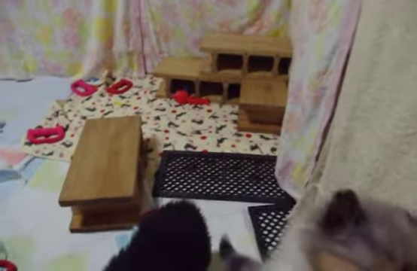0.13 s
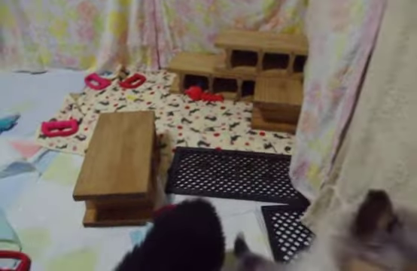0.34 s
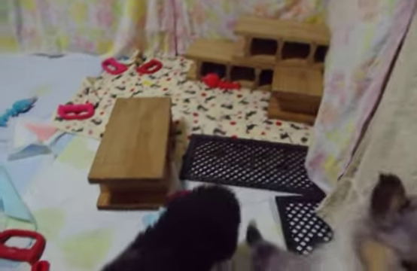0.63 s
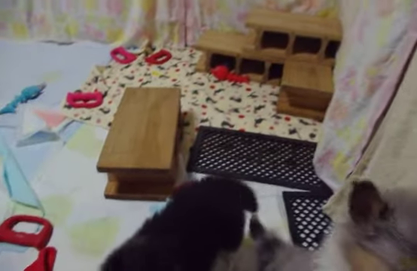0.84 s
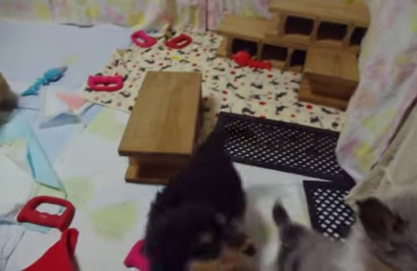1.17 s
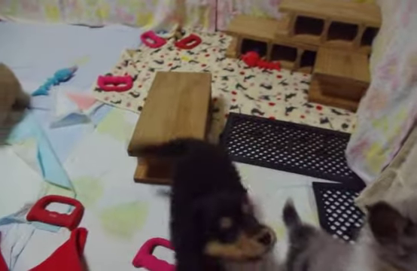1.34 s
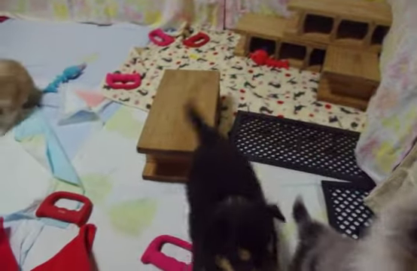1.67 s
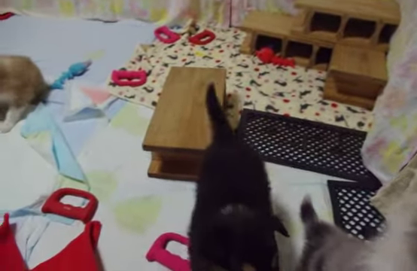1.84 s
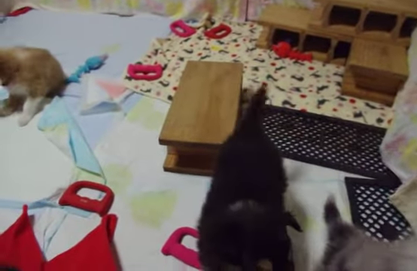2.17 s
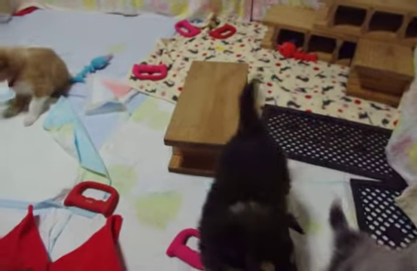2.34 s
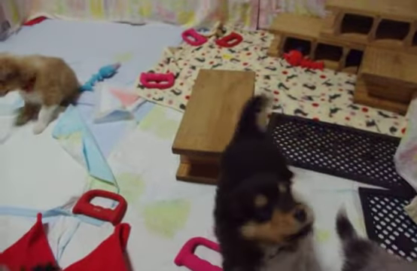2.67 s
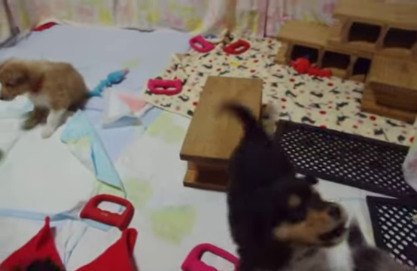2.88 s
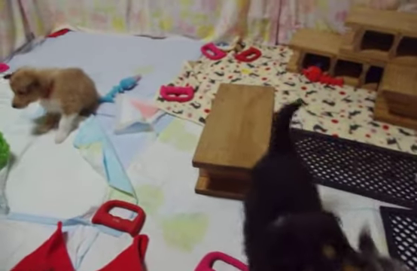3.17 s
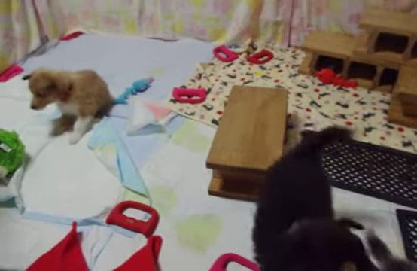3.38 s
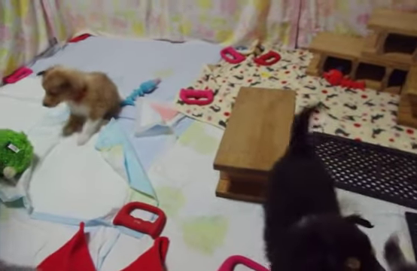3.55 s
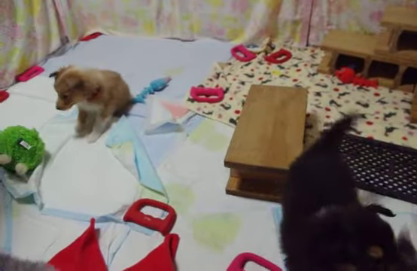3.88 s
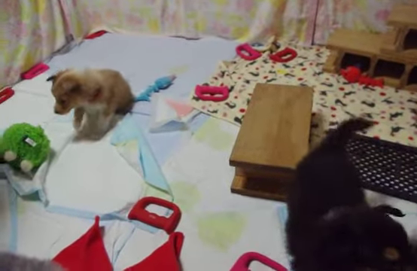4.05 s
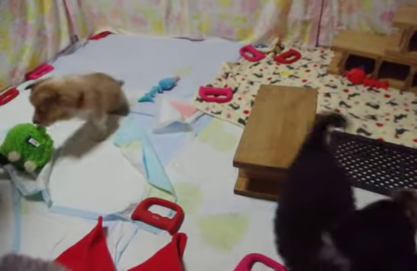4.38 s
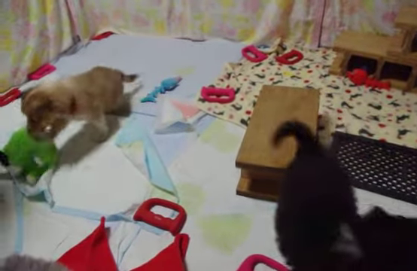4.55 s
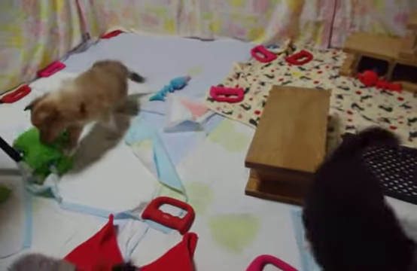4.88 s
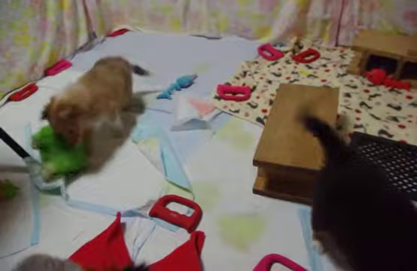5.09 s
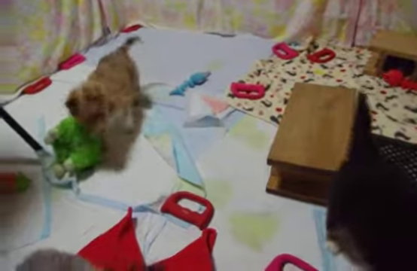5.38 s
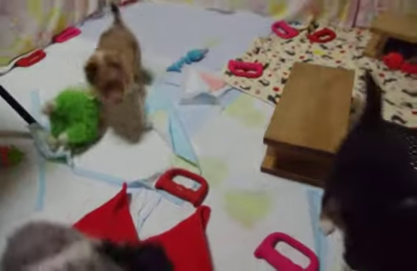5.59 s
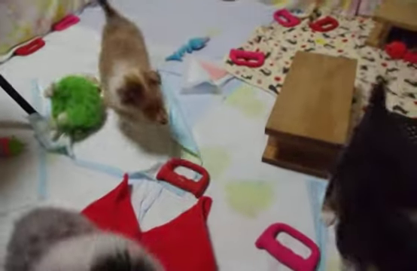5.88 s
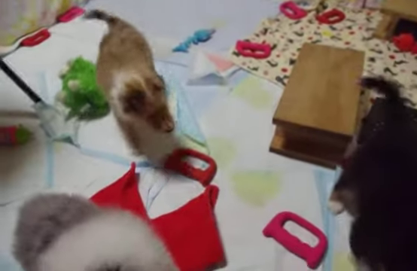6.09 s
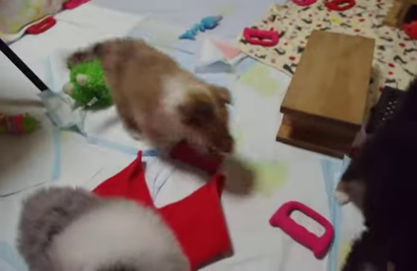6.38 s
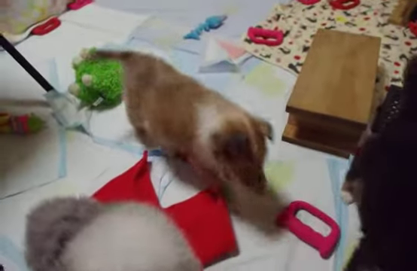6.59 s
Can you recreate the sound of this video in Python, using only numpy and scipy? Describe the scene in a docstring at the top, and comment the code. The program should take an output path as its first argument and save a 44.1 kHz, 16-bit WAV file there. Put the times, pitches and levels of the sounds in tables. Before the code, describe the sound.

A puppy yips and moans, lets out a long piercing howl that turns hoarse, then yelps and whines amid paw thumps and claw ticks.

```python
"""A puppy yips and moans, gives a long strained howl that turns rough, then a short yelp and a falling whine.
Each cry is a nearly pure tone with weak overtones and breathy noise; rasps are noise in slow, uneven pulses.
Claws tick (snaps and short rings), paws thump (dull fading notes) and scuff over paper pads (grainy noise), and
a pup snuffles (a puff of noise). Weak echoes of a cloth-walled indoor pen surround them. A quiet room lies
behind with steady noise; near the end a low hum and rumble come up."""
import sys
import numpy as np
from scipy import signal
from scipy.fft import rfft, irfft
from scipy.io import wavfile
from scipy.ndimage import uniform_filter1d

SR = 44100
rng = np.random.default_rng(int(sys.argv[2]) if len(sys.argv) > 2 else 0)


def transcribe(signal):
    """Save signal, clipped to [-1, 1], as a 16-bit WAV file at the path in sys.argv[1]."""
    frames = np.atleast_2d(signal).T
    limited = np.clip(frames, -1, 1)
    pcm = np.round(limited * 32767).astype(np.int16)
    wavfile.write(sys.argv[1], SR, pcm)


N = 296793
T = np.arange(N) / SR  # time of every sample, s

# Five cries, each from full voice to the start of its fade, before any wobble is added:
# [t/s, pitch f/Hz, fundamental level/dB, overtone level/dB]
YIP_PATH = [(1.305, 1053, -25, -52), (1.314, 986, -28, -51), (1.324, 923, -29, -57), (1.334, 847, -42, -52),
            (1.346, 692, -37.5, -49.5)]
MOAN_PATH = [(1.446, 608, -26.5, -52), (1.466, 631, -33.5, -46), (1.502, 710, -31, -69),
             (1.522, 698, -31, -52.5), (1.596, 604, -34.5, -66), (1.612, 563, -29.5, -73)]
HOWL_PATH = [(2.514, 1785, -11, -47), (2.545, 1612, -15, -34), (2.595, 1539, -13, -34),
             (2.637, 1546, -26, -24.5), (2.654, 1654, -24.5, -28.5), (2.684, 1531, -31, -38.5),
             (2.703, 1225, -23, -40.5), (2.74, 1079, -17, -39), (2.785, 1104, -13.5, -28.5),
             (2.83, 1133, -15, -31), (2.9, 1095, -15.5, -33.5), (2.96, 1110, -17, -41),
             (3.0, 1143, -12, -37), (3.064, 1157, -13, -42)]
YELP_PATH = [(4.311, 1195, -20, -39.5), (4.322, 1152, -21, -35), (4.33, 1000, -23.5, -42),
             (4.342, 880, -44, -44)]
WHINE_PATH = [(4.62, 1326, -23, -44), (4.638, 1314, -18, -39), (4.662, 1274, -26, -51),
              (4.684, 1244, -22, -48), (4.772, 1218, -22.5, -52.5), (4.803, 1213, -40, -49),
              (4.83, 1129, -37, -43.5), (4.878, 1055, -38, -48.5), (4.892, 884, -32, -47),
              (4.901, 760, -41, -56)]
# How strained the voice is in the howl: [t/s, strain 0-1]
HOWL_STRAIN = [(2.6, 0.44), (2.68, 0.43), (2.97, 0.97), (3.0, 0.15)]
# Moments when the wail catches and its pitch sags: [t/s, sag as a share of the pitch]
HOWL_CATCHES = [(2.772, 0.0672), (2.805, .085), (2.853, .025), (2.911, 0.067), (2.941, .02), (2.982, 0.045)]
# The vocal folds break into a rasp:
# [t/s, length/s, level/dB, throat resonance f/Hz, upper resonance level/dB]
RASP_EVENTS = [(2.508, 0.014, -30.5, 1570, -43), (2.623, 0.04, -24, 1490, -29.5),
               (2.661, 0.11, -31, 1544, -54), (4.32, 0.045, -22, 1925, -37), (4.333, 0.055, -40, 1100, -63),
               (4.339, 0.053, -40.5, 1820, -61), (4.882, 0.015, -30.5, 990, -60)]
# Colour of the upper harmonics through the open mouth: [f/Hz, relative level/dB]
MOUTH_COLOUR = [(1500, -6), (2100, 1), (2700, -11), (3250, 1.5), (3750, -9.5), (4400, 2), (5400, -3),
                (6400, -4.5), (8000, -12.5), (9500, -30), (12000, -49.5), (15000, -42)]
# Colour of the upper harmonics through the nose: [f/Hz, relative level/dB]
NOSE_COLOUR = [(1800, 4), (2800, -13), (3400, -5.5), (4050, 2.5), (5000, -17.5), (6100, -11), (7000, -31),
               (7850, -2), (8800, -57), (12000, -39)]
# Colour of the rushing air in a cry: [f/Hz, relative level/dB]
AIR_COLOUR = [(100, -37), (400, -43), (900, -27.5), (1600, 4.5), (2700, -8), (4200, -0.5), (6200, 3.5),
              (8200, 9.5), (9500, 1), (11000, -25), (15000, -28)]
# Clear claw and tooth contacts on hard things: [t/s, level/dB, resonance f/Hz, time to ring down 60 dB/s]
CLEAR_TICKS = [(0.045, -41, 7560, .015), (0.8557, -37.5, 6740, 0.0079), (1.238, -40.5, 4060, .0087),
               (1.4172, -34, 6340, 0.017), (1.707, -39.5, 7300, 0.034), (1.728, -33.5, 8550, 0.037),
               (2.063, -38.5, 6350, 0.013), (2.308, -39, 8350, 0.059), (2.3355, -35, 3270, 0.02),
               (2.444, -38.5, 6940, 0.029), (3.098, -34, 8500, 0.022), (3.5824, -40, 7400, 0.033),
               (3.6929, -37, 5100, 0.0087), (3.874, -40.5, 3200, 0.03), (4.0893, -38.5, 7550, 0.0069),
               (4.2467, -32.5, 8900, 0.0041), (5.568, -40, 1180, 0.022), (5.857, -33.5, 7100, 0.015),
               (6.047, -41.5, 1920, 0.035), (6.117, -30, 6100, 0.0049)]
# Heavier paw falls on the floor and on toys: [t/s, level/dB, resonance f/Hz]
PAW_FALLS = [(1.862, -34, 380), (1.947, -29.5, 332), (2.13, -36.5, 370), (2.335, -30, 690),
             (3.645, -35, 382), (4.785, -28.5, 578), (4.818, -33.5, 337), (5.15, -36, 228),
             (5.568, -32.5, 606), (6.095, -35, 257), (6.681, -31.5, 376)]
# Clear scuffs of paws and fur on the pads: [t/s, length/s, level/dB before flicker]
PAD_SCUFFS = [(0.61, .12, -60.5), (1.38, 0.17, -49.5), (1.68, .12, -51), (1.857, 0.12, -51.5),
              (2.024, 0.056, -51.5), (2.137, 0.054, -55), (4.559, 0.29, -50), (4.817, 0.016, -38),
              (5.032, 0.038, -42.5), (5.119, 0.23, -57.5), (5.7, 0.057, -55), (5.839, 0.16, -47.5),
              (5.99, 0.064, -48.5), (6.077, 0.1, -44.5)]
# Ongoing shuffling of the litter: [t/s, level/dB before flicker]
LITTER_SHUFFLE = [(0, -63.5), (.45, -59.5), (.8, -54.5), (1.15, -60), (1.6, -54), (2.25, -59), (2.5, -54.5),
                  (3.6, -57.5), (4.3, -58), (5.1, -55.5), (6.73, -54.5)]
# Colour of the rustling paper: [f/Hz, relative level/dB]
PAPER_COLOUR = [(300, -14), (1000, -1), (2500, -3.5), (4500, 0), (7500, 3), (10000, 4), (12000, -11.5),
                (15000, -26.5)]
# Colour of a puff through the nose: [f/Hz, relative level/dB]
SNUFFLE_COLOUR = [(500, -27), (1200, -2), (1600, 5), (2200, -17), (4000, -28), (7800, -2.5), (11000, -28)]
# Echoes from near surfaces: [delay t/s, gain]
NEAR_ECHOES = [(.0031, 0.074), (.0074, 0.042), (0.011, .06)]
# Colour of the room's background noise: [f/Hz, relative level per Hz/dB]
ROOM_COLOUR = [(15, -73), (25, -49), (69, -16), (257, -0.5), (301, -1), (335, 0), (573, -3), (673, -2.5),
               (811, -3.5), (879, -7), (1000, -6), (3930, -14.5), (8100, -29.5), (12400, -26.5),
               (15000, -40)]

# Cries swell in and die away at these rates; the air starts earlier and lingers longer
ATTACK_DB_PER_S, RELEASE_DB_PER_S = 2802, 1050
AIR_ATTACK_DB_PER_S, AIR_RELEASE_DB_PER_S = 695, 380
AIR_FOLLOWS = 0.19  # dB of air for each dB of overtones
SHIMMER_DB = 4.5  # most that an overtone flickers up or down
# Side tones between the harmonics: at thirds of the pitch in the shriek, then a faint one at 1.5 times
# the pitch in the wail: (from s, to s, level in dB against the overtones)
SHRIEK_SIDE_TONES, WAIL_SIDE_TONE = (2.56, 2.652, -0.5), (2.72, 4.1, -21)
CATCH_WIDTH_S, CATCH_DIP_DB, CATCH_DIP_LEAD_S = .009, -5.5, 0.0065
RASP_UPPER_HZ = 4380
FAINT_TICKS_PER_S, FAINT_TICK_SPREAD_DB = 1.8, 4  # spread is up or down
FAINT_TICK_DB, FAINT_TICK_HZ, FAINT_TICK_T60_S = -45.5, 7400, .014  # middle level and pitch
THUMP_CYCLES = 16.5  # cycles to fade by 60 dB, so low thumps ring longer
ROOM_TONE_DB, ROOM_T60_S = -55, .28
TOP_HZ = 15300


def undb(db):
    """Turn decibels into gain."""
    return 10 ** (np.asarray(db) / 20)


def unit(x):
    """Scale to an average strength (rms) of 1."""
    return x / np.sqrt(np.mean(x ** 2) + 1e-20)


def response(points, hz):
    """Read a colour table as gain at the given frequencies."""
    f, db = np.transpose(points)
    return undb(np.interp(np.log(hz + 1), np.log(f), db))


def colour(x, points):
    """Filter a sound by a colour table; rms 1."""
    hz = np.fft.rfftfreq(2 * N, 1 / SR)
    spectrum = rfft(x, 2 * N) * response(points, hz)
    return unit(irfft(spectrum)[:N])


def resonate(x, hz, q):
    """Let one damped resonance ring; a higher q rings longer."""
    b, a = signal.iirpeak(min(hz, .45 * SR), max(q, hz / (.4 * SR)), fs=SR)
    return signal.lfilter(b, a, x)


def noise():
    """White noise as long as the scene."""
    return rng.standard_normal(N)


def walk(rate):
    """Smooth random drift of rms 1, changing about rate times a second."""
    size = max(int(SR / rate), 2)
    return unit(uniform_filter1d(uniform_filter1d(noise(), size), size))


def swell(start, length):
    """A quick rise and slower fall."""
    return np.sin(np.pi * np.clip((T - start) / length, 0, 1) ** 0.52) ** 2


def gate(start, end, edge_s=0.027):
    """1 between two times, with soft edges."""
    return np.clip(np.minimum(T - start, end - T) / edge_s + .5, 0, 1)


def add(track, start, sound):
    """Mix a sound into a track at a time in seconds."""
    i = int(start * SR)
    track[i:i + len(sound)] += sound[:N - i]


def puppy():
    """Three cries through the nose, two through the open mouth, and rasps on top."""
    # the yelp cracks half way and turns airy
    crack = np.interp(T, [4.321, 4.331], [0, 1])
    rough = .006 + .06 * crack
    # the whine frays as it runs out
    fray = np.interp(T, [4.78, 4.83, 4.875, 4.89], [.05, .27, .33, 1])
    waver, stutter = .03 * fray, 1.8 * fray
    yip = cry(YIP_PATH, NOSE_COLOUR, second_db=3, air_db=-45, jitter=0.0066)
    moan = cry(MOAN_PATH, NOSE_COLOUR, second_db=2.0, air_db=-54, jitter=0.0043, second_follows=0.24)
    yelp = cry(YELP_PATH, MOUTH_COLOUR, second_db=9, air_db=-47 + 7.2 * crack, jitter=rough)
    whine = cry(WHINE_PATH, NOSE_COLOUR, second_db=-2, air_db=-51.5, jitter=waver, tremble=stutter)
    return yip + moan + howl() + yelp + whine + rasps()


def howl():
    """A shriek with side tones between its harmonics, then a lower, hoarse wail that catches and steadies."""
    strain = np.clip(np.interp(T, *np.transpose(HOWL_STRAIN)), 0, 1)
    sag = sum(depth * catch(start) for start, depth in HOWL_CATCHES)
    # the fundamental dips just ahead of each sag in pitch
    dip_db = CATCH_DIP_DB * sum(catch(start - CATCH_DIP_LEAD_S) for start, depth in HOWL_CATCHES)
    jitter, tremble, hoarse_db = .003 + .006 * strain, .45 * strain, 8 * strain
    # whole multiples of the pitch are left out
    third_multiples = [k / 3 for k in range(4, 15) if k % 3]
    side_tones = [(SHRIEK_SIDE_TONES, third_multiples), (WAIL_SIDE_TONE, [1.5])]
    return cry(HOWL_PATH, MOUTH_COLOUR, second_db=-4.5, air_db=hoarse_db - 45.5, jitter=jitter,
               tremble=tremble, bend=-sag, dip_db=dip_db, side_tones=side_tones)


def catch(start):
    """A brief smooth bump in time."""
    return np.exp(-((T - start) / CATCH_WIDTH_S) ** 2)


def cry(table, tract, second_db, air_db, jitter, second_follows=1.0, tremble=0, bend=0, dip_db=0, side_tones=()):
    """Nearly pure fold vibration, weak overtones shaped by the tract, and air pulsing between the folds."""
    s, pitch, first_db, upper_db = np.transpose(table)
    on = (T > s[0] - .035) & (T < s[-1] + .07)  # work only around the cry
    t = T[on]
    early, late = np.maximum(s[0] - t, 0), np.maximum(t - s[-1], 0)
    envelope = undb(-ATTACK_DB_PER_S * early - RELEASE_DB_PER_S * late)
    first_db = (np.interp(T, s, first_db) + dip_db)[on]
    upper_db = np.interp(t, s, upper_db)
    first, upper = envelope * undb(first_db), envelope * undb(upper_db)
    # the second harmonic and the air both grow with the overtones
    second = envelope * undb(second_db + first_db + second_follows * (upper_db - first_db))
    air_level_db = (air_db + np.zeros(N))[on] + AIR_FOLLOWS * (upper_db - upper_db.max())
    air = undb(air_level_db - AIR_ATTACK_DB_PER_S * early - AIR_RELEASE_DB_PER_S * late)
    # uneven cycles blur the high harmonics first
    uneven = .55 * walk(170) + .9 * walk(1500)
    smooth_pitch = uniform_filter1d(np.interp(t, s, pitch), size=260)
    hz = smooth_pitch * (1 + (bend + jitter * uneven)[on])
    phase = 2 * np.pi * np.cumsum(hz) / SR

    def partials(multiples):
        """Tones at multiples of the pitch, coloured by the tract, each flickering; scaled to about rms 1."""
        gains = [response(tract, k * hz) for k in multiples]
        flickers = [undb(SHIMMER_DB * np.tanh(walk(112)[on])) for k in multiples]
        tones = 0
        for k, gain, flicker in zip(multiples, gains, flickers):
            tones = tones + gain * flicker * np.sin(k * phase + rng.uniform(0, 2 * np.pi))
        return tones / np.sqrt(sum(g ** 2 for g in gains) / 2)

    # a strained voice trembles about forty times a second
    beats = np.sin(np.pi * np.cumsum(40 * (1 + .35 * walk(40))) / SR) ** 4
    shake = (1 - np.clip(tremble, 0, .8) * (beats - beats.mean()))[on]
    voice = np.sqrt(2) * (first * shake * np.sin(phase) + second * np.sin(2 * phase))
    voice += upper * partials(np.arange(3, 13))
    air_pulse = 1 + .5 * np.cos(phase)
    voice += air * colour(noise(), AIR_COLOUR)[on] * air_pulse * shake * undb(1.87 * walk(200)[on])
    for (start, end, db), multiples in side_tones:
        voice += upper * undb(db) * gate(start, end)[on] * partials(multiples)
    out = np.zeros(N)
    out[on] = voice
    return out


def rasps(flap_hz=155):
    """Uneven slow flaps of the folds ring two throat resonances where a cry cracks."""
    out = 0
    flaps = np.sin(np.pi * np.cumsum(flap_hz * (1 + 0.1943 * walk(158.8))) / SR) ** 4 + 0.077

    def ring(hz):
        """Noise pulsed by the flaps through a doubled resonance; rms 1."""
        return unit(resonate(resonate(noise() * flaps, hz, 6.5), hz, 6.5))

    upper = ring(RASP_UPPER_HZ)
    for start, length, db, hz, upper_db in RASP_EVENTS:
        out = out + swell(start, length) * (undb(db) * ring(hz) + undb(upper_db) * upper)
    return out


def ticks():
    """A hard contact gives a sharp snap and a very short grainy ring."""
    out, t = np.zeros(N), T[:4096]
    for start, db, hz, t60 in CLEAR_TICKS + faint_ticks():
        snap = np.sin(2 * np.pi * hz * t) * np.exp(-t / 0.000068)
        crack = rng.standard_normal(len(t))
        grain = unit(unit(resonate(crack, hz, 2.8)) + 0.68 * crack)
        ring = grain * undb(-60 * t / t60)
        add(out, start, undb(db) * (2.1 * snap + ring))
    # soften the very top
    return signal.sosfilt(signal.butter(6, 10800, fs=SR, output="sos"), out)


def faint_ticks():
    """Light claw contacts at random moments, in rows like those of CLEAR_TICKS."""
    rows = []
    for when, force, spot in rng.random((int(FAINT_TICKS_PER_S * N / SR), 3)):
        db = FAINT_TICK_DB + FAINT_TICK_SPREAD_DB * (2 * force - 1)
        hz = FAINT_TICK_HZ * 2 ** ((spot - .5) / 2)  # up to a quarter octave either way
        rows.append((when * N / SR, db, hz, FAINT_TICK_T60_S))
    return rows


def thumps(push_s=0.0056):
    """A soft paw pushes a damped surface, which gives a brief dull note."""
    out, t = np.zeros(N), T[:8192]
    for start, db, hz in PAW_FALLS:
        scrub = resonate(resonate(rng.standard_normal(len(t)), hz, 0.93), hz, 0.93)
        body = unit(np.sin(2 * np.pi * hz * t) + .5 * unit(scrub))
        fade = undb(db - 60 * t * hz / THUMP_CYCLES)
        add(out, start, fade * (1 - np.exp(-t / push_s)) * body)
    return out


def rustle():
    """Paper pads crackle in dense tiny grains under shuffling and scuffing paws."""
    sizes = undb(3.2 * np.minimum(rng.exponential(size=N), 5))  # a few grains are much larger
    grains = colour(noise() * sizes, PAPER_COLOUR)
    unrest_db = 1.7 * walk(33)
    shuffle = undb(np.interp(T, *np.transpose(LITTER_SHUFFLE)) + unrest_db)
    scuffs = sum(undb(db) * swell(start, length) for start, length, db in PAD_SCUFFS)
    return grains * (shuffle + scuffs * undb(3.4 * walk(250)))


def snuffle():
    """A pup puffs once through its nose: a short swell of coloured noise."""
    return undb(-46.0) * swell(3.412, 0.074) * colour(noise(), SNUFFLE_COLOUR)


def pen(x, t60=0.22, wet_db=-22, room_db=-34):
    """Weak echoes from floor and boxes, a short tail soaked up by cloth walls, and the faint room beyond."""
    t = T[:SR // 2]
    impulse = np.zeros(len(t))
    for decay, db in [(t60, wet_db), (ROOM_T60_S, room_db)]:
        tail = rng.standard_normal(len(t)) * undb(-60 * t / decay) * (t > .005)
        impulse += undb(db) * tail / np.sqrt(np.sum(tail ** 2))
    impulse[0] = 1  # the direct sound
    for delay, gain in NEAR_ECHOES:
        impulse[int(delay * SR)] += gain
    return signal.fftconvolve(x, impulse)[:N]


def room_tone():
    """Soft steady coloured noise; a low hum and rumble come up near the end."""
    rise = undb(np.interp(T, [5.2, 5.8, 6.5], [-18, -4, 0]))
    hum = undb(-69.0 + 2 * walk(8)) * np.sqrt(2) * np.sin(2 * np.pi * 64 * T)
    rumble_colour = [(30, -6.5), (60, -31), (130, -1.0), (250, -8.5), (600, -22), (1500, -66)]  # f/Hz, level/dB
    rumble = undb(-66) * colour(noise(), rumble_colour)
    steady = undb(ROOM_TONE_DB + 0.15 * walk(6)) * colour(noise(), ROOM_COLOUR)
    return steady + rise * (hum + rumble)


def scene():
    """Everything in the pen, heard by one microphone, over the room's background."""
    in_pen = puppy() + ticks() + thumps() + rustle() + snuffle()
    return (pen(in_pen) + room_tone())[None]


def record(dry):
    """Two filters cut the deepest bass and the top of the spectrum."""
    dry = signal.sosfilt(signal.butter(2, 45, "highpass", fs=SR, output="sos"), dry)
    return signal.sosfilt(signal.ellip(8, .2, 70, TOP_HZ, fs=SR, output="sos"), dry)


dry = scene()
out = record(dry)
transcribe(out)
```